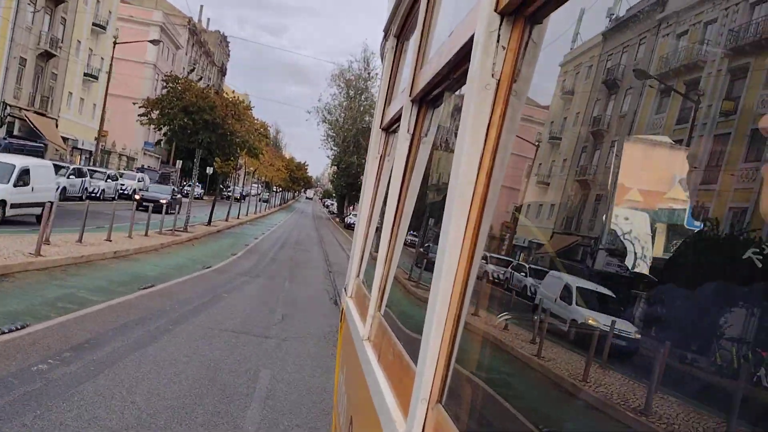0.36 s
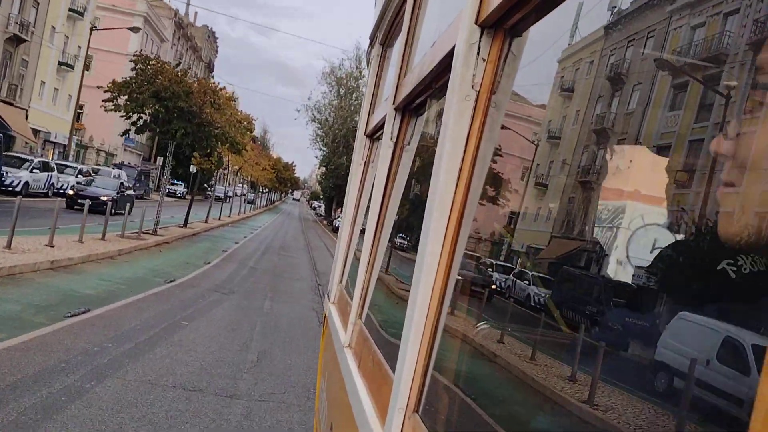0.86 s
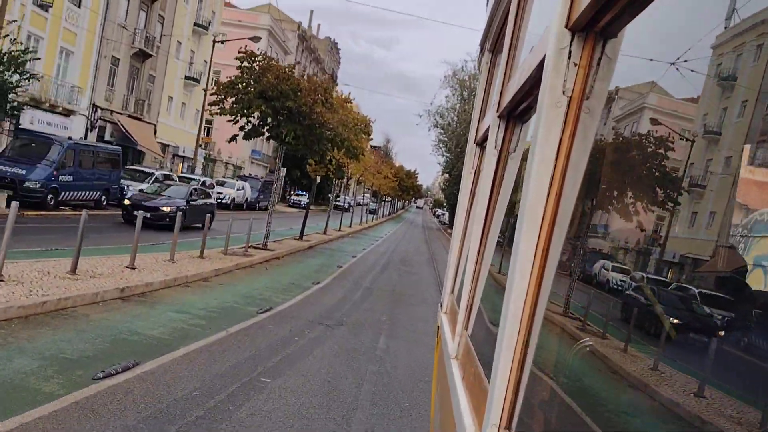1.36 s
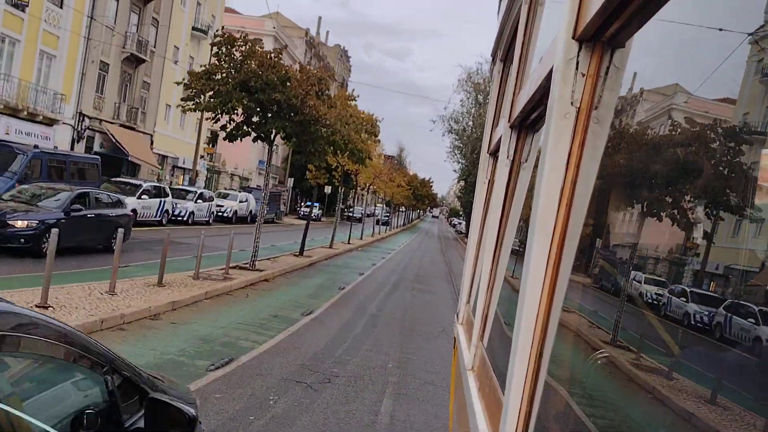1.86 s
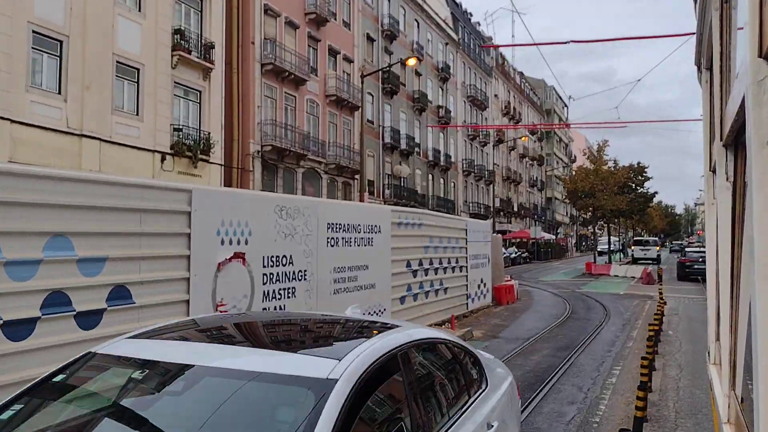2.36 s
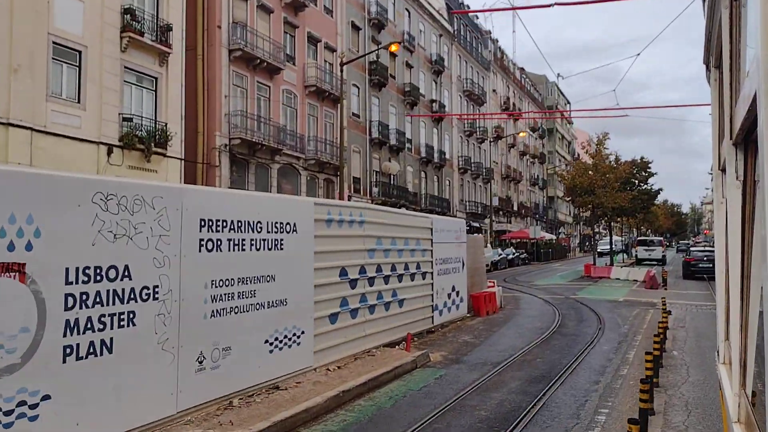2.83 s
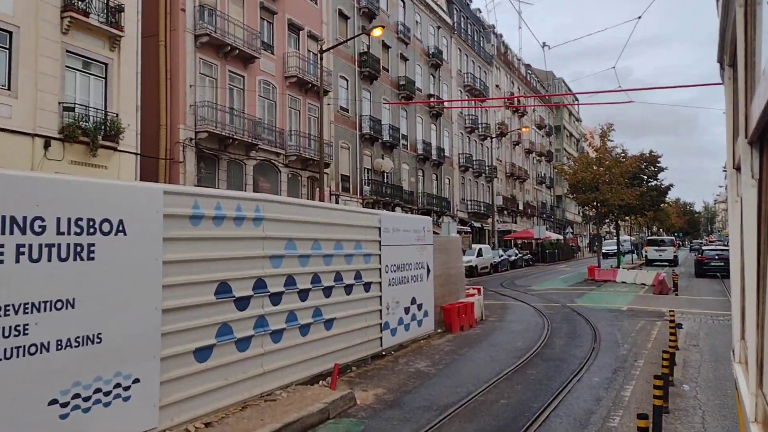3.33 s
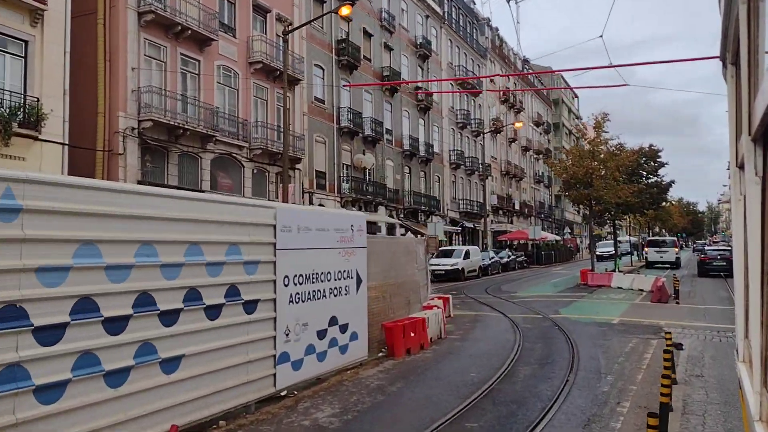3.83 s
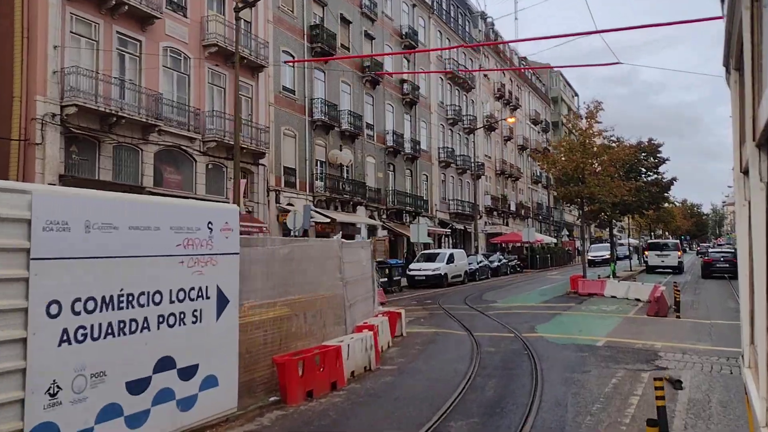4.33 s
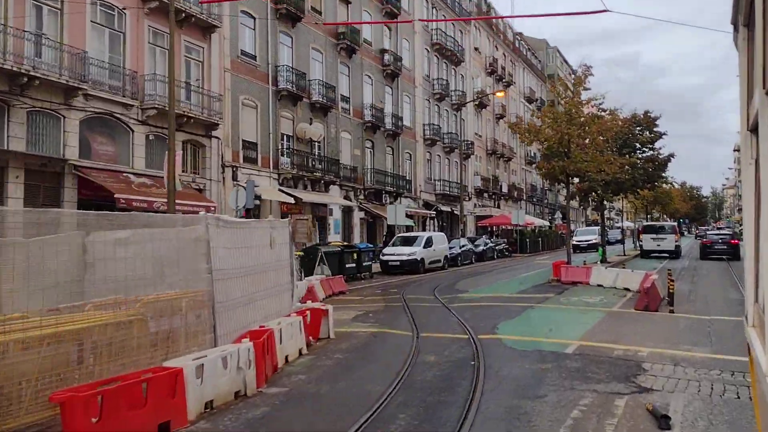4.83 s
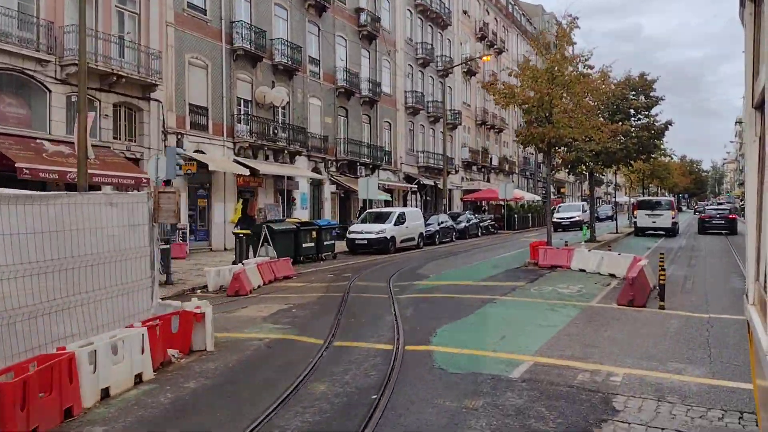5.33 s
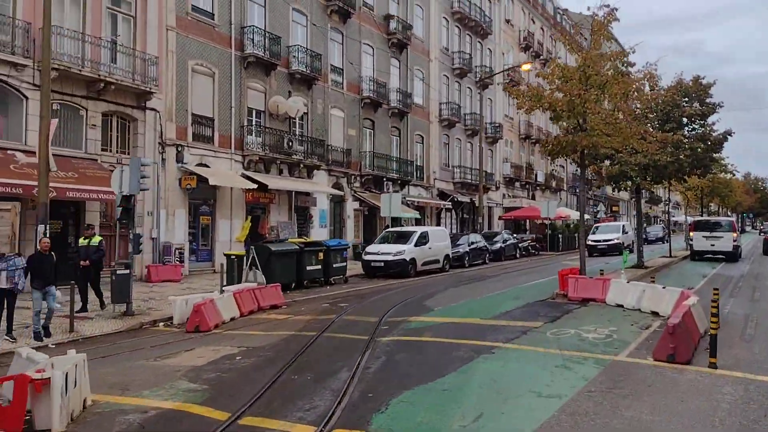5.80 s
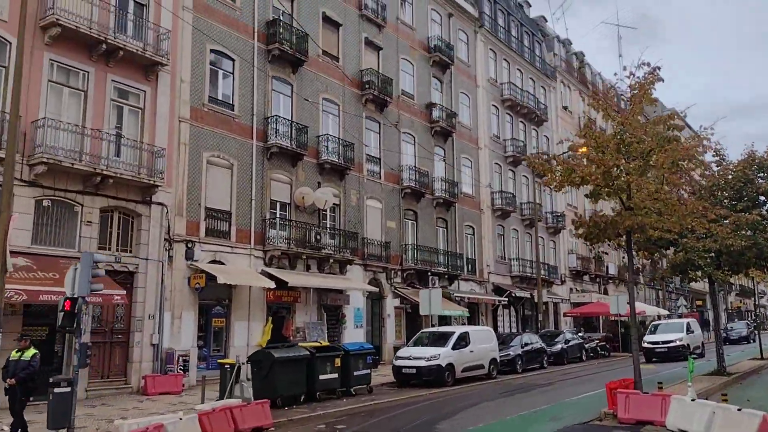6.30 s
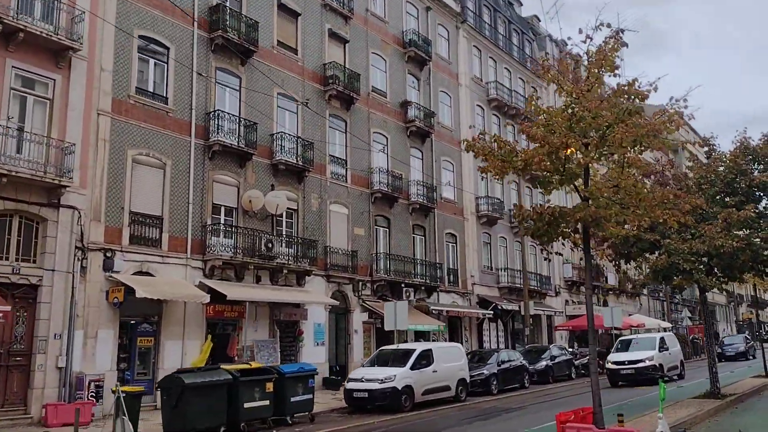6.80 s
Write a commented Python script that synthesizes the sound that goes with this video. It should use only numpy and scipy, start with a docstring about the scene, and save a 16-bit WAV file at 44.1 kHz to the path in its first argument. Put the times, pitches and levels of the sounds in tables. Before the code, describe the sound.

From 0 to about 2.1 seconds, an old tram rolls along street rails, heard close through a small, slightly dull microphone out of the window. Rough grinding, airy hiss with short drifting echoes from the tram's side, and wavering metallic wheel rings dominate, singing out briefly several times in the first second. Wind flutters, with stronger thumps near 0.9 and 1.2, then a cluster from 1.4 to 1.7. A faint high gear whine climbs, clearest from 1.1 to 1.9, as a car's tyre roar swells from 1.4. It cuts hard to silence until 2.4. The second stretch is heavier: low grinding, wheel ring and bright hiss, strongest around 4 to 5, under nearly constant buffeting wind. Hard slaps at about 4.8, 5.0, 6.2 and 6.4 distort and momentarily push the tram down. The tram eases slightly, wind still battering, and everything stops abruptly at 6.9, leaving silence.

```python
"""Tram ride in the wind

An old electric tram on street rails, through a small microphone held out of its window. Filtered noise grinds,
hisses and rings the wheel resonances; a smeared tone is the gear whine, a swelling band of noise a passing car.
Wind eddies are filtered random pulses that saturate the microphone port and drive a limiter; the tram dips briefly
now and then. Two stretches of the ride, parted and ended by hard cuts to silence."""
import sys
import numpy as np
from scipy import signal
from scipy.fft import rfft, irfft, next_fast_len
from scipy.io import wavfile
from scipy.ndimage import uniform_filter1d, minimum_filter1d

SR = 44100
rng = np.random.default_rng(int(sys.argv[2]) if len(sys.argv) > 2 else 0)


def dump_mix(stems):
    """Bounce the given channels to the path in sys.argv[1] as a 16-bit WAV at rate SR."""
    frames = np.atleast_2d(stems).T  # one column per channel
    limited = np.clip(frames, -1, 1)  # hard clip at full scale
    pcm = np.round(limited * 32767).astype(np.int16)
    wavfile.write(sys.argv[1], SR, pcm)


def natural_amplitude(level_db):
    """Convert a level in decibels to a linear amplitude factor, elementwise."""
    exponent = np.asarray(level_db, float) / 20
    return 10 ** exponent


N = 316197

# audible stretches of the ride: (start [s], end [s])
STRETCHES_S = [(0, 2.0635), (2.4254, 6.885)]
# tram, one table a stretch: (time [s], hiss before echoes [dB], wheel grind [dB])
TRAM_LEVELS = [
    [(0, -43, -39), (.33, -40, -33.5), (.78, -39, -32.5), (1.2, -40, -34.5), (1.45, -38, -31.5),
     (1.8, -32.5, -32.5), (2.06, -33, -27)],
    [(2.43, -38, -27), (2.7, -37, -26.5), (3.1, -39, -28.5), (3.55, -38.5, -23.5), (3.9, -33, -27),
     (4.3, -36.5, -31), (4.55, -32, -29.5), (4.9, -33, -22.5), (5.2, -41, -29), (5.85, -39, -28.5),
     (6.2, -42, -32), (6.55, -40.5, -27.5), (6.88, -45, -32.5)],
]
# steel wheel resonances, low and high group: (centre [Hz], width of each of two passes [Hz], relative level [dB])
WHEEL_MODES = [
    [(1191.3, 20, 3), (1340, 5, -5.5), (743.6, 19, -6), (396.2, 24, -12.5)],
    [(1714, 160, 1), (1833, 77, -3), (2132, 180, -4), (2217, 87, 0.5)],
]
# grind of wheel on rail, one spectrum a stretch: (frequency [Hz], relative density [dB per Hz])
GRIND_SPECTRA = [
    [(35, -37.5), (60, -6.5), (327, -12), (374, -1), (998, -4), (1160, 0.5), (1350, -11.5), (1670, -1),
     (3200, -28.5), (4160, -48.5), (7040, -120)],
    [(35, -36.5), (60, 1), (259, -5.5), (539, -22), (740, -10), (1180, -11), (1980, -17.5), (2180, -9),
     (3200, -40.5), (4160, -59.5), (7040, -120)],
]
# hiss of rail, street and air, four colours in turn: (frequency [Hz], relative density [dB per Hz])
HISS_SPECTRA = [
    [(1530, -42), (2600, -7), (3490, -4.5), (3820, -9), (4510, -7), (5330, -10.5), (5710, -8.5), (6150, 0),
     (7270, -2.5), (7750, -4), (8430, -18), (11000, -41), (18500, -120)],
    [(1530, -50.5), (2600, -20), (3550, -7), (4010, -8.5), (5600, -4), (6000, -5.5), (7490, -3), (7990, -7),
     (8430, -15.5), (11000, -59.5), (18500, -120)],
    [(1530, -12.5), (2600, -3), (2900, -10), (3580, -7), (4420, 0), (4950, -3), (6690, -5), (7240, -0.5),
     (7680, -4.5), (8430, -19.5), (11000, -64.5), (18500, -120)],
    [(1530, -27.5), (2600, -2.5), (3040, -7), (3200, -17), (3480, -7.5), (4400, 2), (4910, -2.5), (7340, 0),
     (7790, -4.5), (8430, -16), (11000, -58), (18500, -120)],
]
# start and end of each crossfade between hiss colours, in turn: (time [s])
HISS_TIMES_S = [1.1, 1.6, 2.2, 2.3, 3.9, 5.0]
# low and high wheel ring against the hiss, one row a stretch: (low [dB], high [dB])
RING_SHARES_DB = [(-5.5, -8), (-6, -3)]
# a wheel group sings out or falls quiet: (centre [s], half-width to 1/e [s], swell [dB], group 0 low 1 high)
RING_SWELLS = [(.05, 0.067, 19, 1), (0.196, .04, 10, 1), (0.088, .08, -16.5, 0), (.19, .04, 14, 0),
               (.32, 0.042, 2.5, 0), (.45, 0.052, 6.5, 0), (.6, 0.055, 12, 1), (.76, .06, 10.5, 0),
               (.88, 0.033, -7, 0), (1.02, 0.082, 14.5, 0), (2.443, .05, 1, 0), (2.616, 0.067, 9.5, 0),
               (3.735, 0.1, 10, 0), (4.506, 0.063, 5, 0), (4.955, .06, 4.5, 0), (6.602, .15, 1.5, 1),
               (5.865, 0.068, 8.5, 1)]
RING_WAVER_DB, RING_WAVER_HZ = 2.5, 18.0
# off road, side panel and window frame: (mean delay at time 0 [ms], level before fade [dB])
ECHO_PATHS = [(1.4, -9.5), (2.098, -3), (3.4, -6)]
# the echoes fade as the street opens: (time [s], added level [dB])
ECHO_FADE = [(0, 1), (1.6, -1.5), (2.3, -4.5), (7, -5)]
# brief dips of the tram sound: (full depth from [s], hold [s], depth [dB])
TRAM_DIPS = [(0.963, 0.074, 6), (1.2, 0.056, 2.5), (1.315, 0.038, 7.5), (1.66, .03, 4.5),
             (2.489, 0.05, 3.5), (2.754, .05, 3.5), (2.939, .09, 6), (3.979, 0.035, 3.5),
             (4.562, 0.057, 4.5), (4.696, 0.071, 12.5), (5.03, 0.098, 11), (5.461, 0.048, 8),
             (5.567, .04, 3.5), (5.922, 0.036, 7), (6.05, .07, 5), (6.425, 0.029, 7.5), (6.774, .04, 2.5)]
DIP_FALL_S, DIP_RECOVER_S = 0.018, 0.04
# gear whine: (time [s], frequency [Hz], mean level [dB])
GEAR_WHINE = [(.2, 4710, -59.5), (1.0, 5250, -50.5), (1.15, 5370, -43), (1.35, 5420, -42), (1.5, 5570, -38),
              (1.7, 5770, -55), (1.87, 5650, -38.5), (2.06, 5710, -44)]
# tyres of a car drawing level: (time [s], level [dB])
CAR_LEVEL = [(1.35, -53.5), (1.5, -31.5), (1.8, -27.5), (2.06, -24.5)]
# tyre roar: (centre [Hz], width of each of two passes [Hz])
TYRE_RESONANCE = (1556, 450)
# gusts on the port: (full from [s], hold [s], gust [dB], small eddies re gust [dB], largest eddies re gust [dB])
WIND_GUSTS = [(0.0, .012, -20, -0.5, -16), (0.27, 0.21, -33, -6.5, 0.5), (0.484, 0.25, -32.5, -5, -6),
              (0.882, 0.17, -18, -5.5, 0), (1.104, 0.06, -31.5, 3.5, -2), (1.176, 0.043, -23, -0.5, 2),
              (1.244, 0.043, -20.5, -11, 1.5), (1.437, .02, -17.5, -13.5, -5), (1.493, 0.031, -14, -10, -2),
              (1.575, .03, -15, -12, -4.5), (1.632, 0.052, -15, -10, -7), (1.732, 0.094, -22.5, -4, -14),
              (1.882, 0.091, -20, -1.5, -6), (2.01, .05, -20.5, -11, -4), (2.424, 0.13, -16, -14.5, -7),
              (2.615, 0.22, -14.5, -11.5, -9), (2.9, 0.15, -15, -9.5, -3.5), (3.079, 0.21, -16.5, -7.5, -3),
              (3.246, .12, -16.5, -16, -3.5), (3.455, 0.063, -15.5, -23, -3), (3.596, 0.059, -18, -13, 1.5),
              (3.824, 0.034, -31, -20, 3), (3.954, 0.078, -16, -11.5, -5), (4.079, .09, -17.5, -9.5, -1.5),
              (4.206, 0.089, -12.5, -16, -8.5), (4.357, 0.019, -15.5, -10.5, 1),
              (4.423, 0.066, -17, -9, -3), (4.555, 0.043, -12.5, -9.5, -3), (4.66, 0.048, -10, -17, -2),
              (4.736, 0.026, -16, -6.5, -3), (4.787, 0.073, -18.5, -8.5, -5),
              (4.972, 0.11, -24.5, -0.5, 2.5), (5.147, 0.14, -14.5, -10.5, -7.5),
              (5.288, 0.23, -14, -14, -5), (5.546, 0.093, -14, -8, -3), (5.69, 0.13, -14, -10.5, -6.5),
              (5.877, 0.236, -15, -10.5, -2.5), (6.11, 0.25, -15.5, -10, -2.5),
              (6.26, 0.18, -16, -16.5, -8), (6.481, 0.073, -18.5, -11.5, -0.5),
              (6.608, 0.12, -14, -9.5, -2), (6.754, .13, -13.5, -15.5, -3.5)]
GUST_RISE_S, GUST_FALL_DB_PER_S = 0.035, 300
# breeze between gusts: (breeze [dB], small eddies re breeze [dB], largest eddies re breeze [dB])
CALM_BREEZE = (-36, -16.5, -1)
# sharp eddies that slap the port, before it saturates: (time [s], peak [dB], flutter [dB])
PORT_SLAPS = [(0.882, -6, -18.5), (1.004, -10, -10), (1.05, -22, -16), (1.192, 7, -14), (1.215, -2.5, -30),
              (1.434, -9.5, -18), (1.521, -9, -17), (1.6, -10, -19), (1.677, 3, -27), (2.513, -5, -15.5),
              (2.64, -9, -17), (2.745, -2, -19.5), (2.785, -14, -25), (3.008, -2, -16.5), (3.19, -2.5, -25),
              (3.95, -0.5, -25), (4.222, 0, -21.5), (4.275, -14, -18.5), (4.45, -3, -22), (4.58, -3.5, -24),
              (4.706, -10, -21), (4.722, -8, -9), (4.803, 6, -14), (4.984, 11.5, -9), (5.036, -6, -37),
              (5.061, -9, -37), (5.102, -6, -21.5), (5.151, -2, -11.5), (5.196, -11, -17.5),
              (5.289, -20, -46), (5.375, -3.5, -25), (5.456, -2, -21), (5.558, -12, -12),
              (5.763, -4.5, -26), (5.79, -2.5, -26), (5.871, -5.5, -11), (5.921, -9, -13), (5.973, -2, -25),
              (6.039, -8, -7.5), (6.141, -11, -23.5), (6.186, 10, -29.5), (6.311, 3, -27.5),
              (6.411, 6, -16.5), (6.592, -16, -19.5), (6.741, -1, -24.5), (6.792, -2.5, -13)]
SLAP_WIDTH_MS = 1.7
FLUTTER_MS, FLUTTER_MS_PER_DB = 8.4, -0.2   # decay at -20 dB; stronger flutters are shorter
PORT_TOP_DB = -1.0   # limit of the pressure, before the low-pass
STOP_EDGE_HZ = 9316
CEILING_DB, RELEASE_DB_PER_S = -3.3, 120


def rms_one(x):
    """Scales to rms 1."""
    return x / np.sqrt(np.mean(x ** 2) + 1e-20)


def in_time(rows):
    """Columns of a table, joined by straight lines, one value a sample."""
    s, *columns = np.transpose(rows)
    return [np.interp(np.arange(N) / SR, s, column) for column in columns]


def coarse():
    """Times of a control [s], 64 samples apart."""
    return np.arange(0, N + 64, 64) / SR


def fine(control):
    """A coarse control at every sample."""
    return np.interp(np.arange(N) / SR, coarse(), control)


def drift(pole_hz):
    """Slow chance of rms 1: noise twice through a one-pole low-pass, at SR / 20."""
    r = np.exp(-40 * np.pi * pole_hz / SR)
    noise = rng.standard_normal(N // 20 + 2002)
    slow = signal.lfilter([1], [1, -2 * r, r * r], noise)[2000:]   # settled part
    return np.interp(np.arange(N) / 20, np.arange(len(slow)), rms_one(slow))


def band(x, low_hz, high_hz):
    """Butterworth band-pass."""
    return signal.sosfilt(signal.butter(2, [low_hz, high_hz], "band", fs=SR, output="sos"), x)


def resonance(x, hz, width_hz):
    """Two-pole resonance, gain 1 at its top."""
    r = np.exp(-np.pi * width_hz / SR)
    poles = [1, -2 * r * np.cos(2 * np.pi * hz / SR), r * r]
    return signal.lfilter([(1 - r * r) / 2, 0, (r * r - 1) / 2], poles, x)


def tram():
    """Rough rolling noise keeps the wheel resonances ringing; coloured noises are the grind and hiss."""
    hiss_db, grind_db = in_time(sum(TRAM_LEVELS, []))
    roughness = rng.standard_normal(N) * natural_amplitude(2.0 * drift(25.0))
    low, high = [wheel_ring(roughness, modes) for modes in WHEEL_MODES]
    grind = passing_colours(GRIND_SPECTRA, [2.2, 2.3], patchy_db=2.5)
    hiss = near_echoes(passing_colours(HISS_SPECTRA, HISS_TIMES_S, patchy_db=1.4))
    rings = natural_amplitude(ring_db(0)) * low + natural_amplitude(ring_db(1)) * high
    return natural_amplitude(grind_db) * grind + natural_amplitude(hiss_db) * (hiss + rings)


def wheel_ring(roughness, modes):
    """Modes of a steel wheel, each a double resonance driven by the roughness."""
    ring = 0
    for hz, width_hz, db in modes:
        mode = resonance(resonance(roughness, hz, width_hz), hz, width_hz)
        ring = ring + natural_amplitude(db) * rms_one(mode)
    return ring


def ring_db(group):
    """A wheel group wavers around its share and now and then sings out or falls quiet."""
    t = coarse()
    swells = sum(db * np.exp(-((t - s) / length_s) ** 2)
                 for s, length_s, db, which in RING_SWELLS if round(which) == group)
    share = np.where(t < STRETCHES_S[0][1], RING_SHARES_DB[0][group], RING_SHARES_DB[1][group])
    return fine(share + swells) + RING_WAVER_DB * drift(RING_WAVER_HZ)


def passing_colours(spectra, times_s, patchy_db):
    """Noise whose bands flicker on their own, holding each colour, then crossfading to the next."""
    white, size = rng.standard_normal(N), next_fast_len(N)
    hz = np.concatenate(spectra)[:, 0]
    edges_hz = np.geomspace(hz.min(), hz.max(), int(2.5 * np.log2(hz.max() / hz.min())))
    flickers = [band(white, low, high) * (natural_amplitude(patchy_db * drift(9.0)) - 1)
                for low, high in zip(edges_hz, edges_hz[1:])]
    patchy = rfft(white + sum(flickers), size)
    bins_hz = np.arange(size // 2 + 1) * SR / size
    colour = np.interp(np.arange(N) / SR, times_s, np.repeat(np.arange(len(spectra)), 2)[1:-1])
    out = 0
    for k, spectrum in enumerate(spectra):
        hz, db = np.transpose(spectrum)
        shape = natural_amplitude(np.interp(np.log(bins_hz + 1), np.log(hz), db))
        coloured = rms_one(irfft(patchy * shape, size)[:N])
        out = out + np.maximum(1 - np.abs(colour - k), 0) * coloured
    return out


def near_echoes(x):
    """Short echoes whose paths wander and slowly shorten comb the hiss into drifting, rising streaks."""
    fade_db, = in_time(ECHO_FADE)
    now = np.arange(N)
    out = x
    for delay_ms, db in ECHO_PATHS:
        stretch = 1 + 0.037 * drift(1.2) - 0.05 * now / SR
        delay = delay_ms * SR / 1000 * stretch
        out = out + natural_amplitude(db + fade_db) * np.interp(now - delay, now, x)
    return out


def dips():
    """Gain that falls quickly, stays down and recovers, by straight lines in dB."""
    t = coarse()
    depth_db = 0
    for s, hold_s, db in TRAM_DIPS:
        fall = 1 + (t - s) / DIP_FALL_S
        recovery = 1 - (t - s - hold_s) / DIP_RECOVER_S
        depth_db = depth_db + db * np.clip(np.minimum(fall, recovery), 0, 1)
    return natural_amplitude(-fine(depth_db))


def whine():
    """Worn teeth: a tone that follows the speed, smeared into a narrow rough band."""
    hz, level_db = in_time(GEAR_WHINE)
    phase = 2 * np.pi * np.cumsum(hz) / SR
    smear = drift(65.0) * np.sin(phase) + drift(65.0) * np.cos(phase)
    return natural_amplitude(level_db + 3.5 * drift(14.0)) * smear * (np.arange(N) < STRETCHES_S[0][1] * SR)


def car():
    """Tyre roar: resonant noise, swelling as the car comes alongside."""
    level_db, = in_time(CAR_LEVEL)
    roar = resonance(resonance(rng.standard_normal(N), *TYRE_RESONANCE), *TYRE_RESONANCE)
    return natural_amplitude(level_db) * rms_one(roar) * (np.arange(N) < STRETCHES_S[0][1] * SR)


def wind():
    """The largest eddies push, middle ones thump, small ones come in clumps and crackle on top."""
    large = eddies(300.0, 57.0, 135.0, spread_db=0.0)
    middle = eddies(600.0, 96.0, 340.4, spread_db=2.5) * natural_amplitude(2.2 * drift(16.0))
    small = eddies(700.0, 300.0, 800.0, spread_db=3.0) * natural_amplitude(3.2 * drift(25.0))
    t = coarse()
    calm_db, calm_small_db, calm_large_db = CALM_BREEZE
    gains = natural_amplitude(calm_db) * natural_amplitude(np.array([[0], [calm_small_db], [calm_large_db]])) * np.ones(len(t))
    for start_s, hold_s, db, small_db, large_db in WIND_GUSTS:
        rise = np.clip(1 + (t - start_s) / GUST_RISE_S, 0, 1)
        fall_db = GUST_FALL_DB_PER_S * np.clip(t - start_s - hold_s, 0, 1)
        gust = rise * natural_amplitude(db - fall_db)
        gains = np.maximum(gains, gust * natural_amplitude(np.array([[0], [small_db], [large_db]])))
    middle_gain, small_gain, large_gain = [fine(gain) for gain in gains]
    return large_gain * large + natural_amplitude(-2.0) * middle_gain * rms_one(middle) + small_gain * rms_one(small)


def eddies(per_s, low_hz, high_hz, spread_db):
    """Eddies pass the port at random, each a lump of pressure of either sign; rms 1."""
    sizes = natural_amplitude(spread_db * np.minimum(rng.exponential(1, N), 4)) * rng.choice([-1, 1], N)
    born = rng.random(N) < per_s / SR
    return rms_one(band(sizes * born + 1e-18, low_hz, high_hz))


def slaps():
    """Each slap is a smooth lump, mostly suction, rebounding on either side, with a short vortex flutter."""
    out, t = np.zeros(N), np.arange(-400, 2000) / SR
    flutter = rms_one(band(band(rng.standard_normal(N), 370.0, 1100.0), 360.0, 1700.0))
    flutter = flutter / np.sqrt(uniform_filter1d(flutter ** 2, size=220) + 0.05)   # evened out
    u = ((2000 * t - 2) / SLAP_WIDTH_MS) ** 2   # centred 1 ms after the slap time
    lump = (1 - 0.9 * u) * np.exp(-u)
    signs = rng.choice([-1, -1, -1, 1], len(PORT_SLAPS))
    for (s, peak_db, flutter_db), sign in zip(PORT_SLAPS, signs):
        decay_ms = max(FLUTTER_MS + FLUTTER_MS_PER_DB * (flutter_db + 20), 3)
        age = np.maximum(1000 * t / decay_ms, 0)
        span = slice(round(s * SR) - 400, round(s * SR) + 2000)
        out[span] += sign * natural_amplitude(peak_db) * lump
        out[span] += natural_amplitude(flutter_db) * flutter[span] * np.clip(1000 * t, 0, 1) * np.exp(-age ** 2)
    return out


def port(pressure):
    """Wind pressure saturates at the port and dies away steeply above the small eddies."""
    pressure = pressure / (1 + (pressure / natural_amplitude(PORT_TOP_DB)) ** 4) ** 0.25
    return signal.sosfilt(signal.butter(4, 1900.0, fs=SR, output="sos"), pressure)


def scene():
    """Wind at the port over the dipping sound of tram, gears and car."""
    gusts = port(wind() + slaps())
    return (gusts + dips() * (tram() + whine() + car()))[None]


def limiter(x):
    """Looks ahead, holds peaks at the ceiling and recovers at a steady rate, ducking the quieter sounds."""
    over_db = np.maximum(20 * np.log10(np.abs(x) + 1e-9) - CEILING_DB, 0)
    ramp_db = RELEASE_DB_PER_S * np.arange(N) / SR
    held_db = np.maximum.accumulate(over_db + ramp_db) - ramp_db
    ahead_db = -minimum_filter1d(-held_db, size=65)
    return x * natural_amplitude(-uniform_filter1d(ahead_db, size=65))


def low_pass(x):
    """Removes everything above the highest recorded frequency."""
    return signal.sosfilt(signal.butter(12, 8580, fs=SR, output="sos"), x)


def record(dry):
    """A narrow top, the limiter, then the cuts."""
    x = signal.sosfilt(signal.cheby2(10, 55, STOP_EDGE_HZ, fs=SR, output="sos"), dry[0])
    t = np.arange(N) / SR
    x = limiter(x) * sum((t >= start_s) & (t < end_s) for start_s, end_s in STRETCHES_S)
    return low_pass(x[None])


dry = scene()
out = record(dry)
dump_mix(out)
```